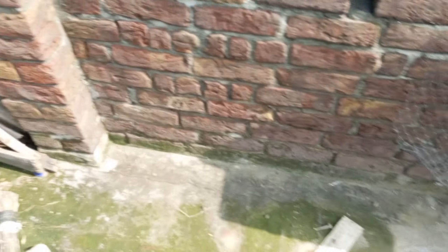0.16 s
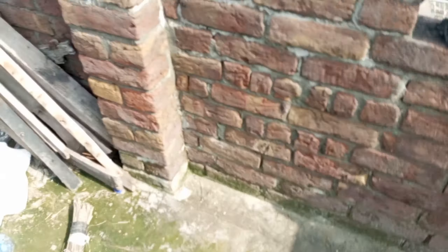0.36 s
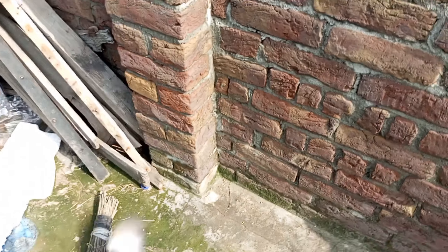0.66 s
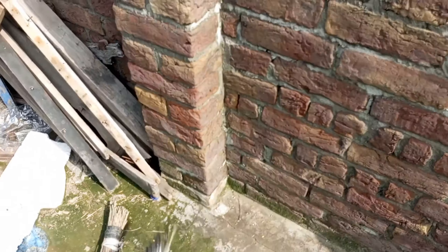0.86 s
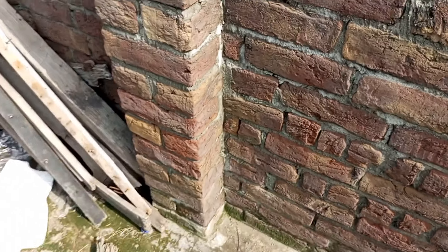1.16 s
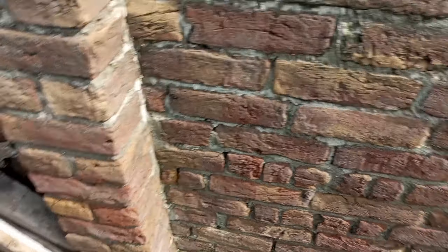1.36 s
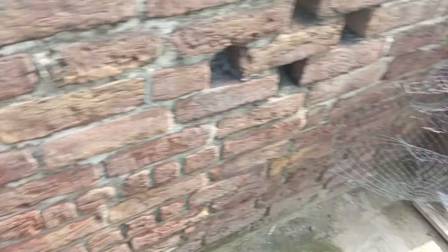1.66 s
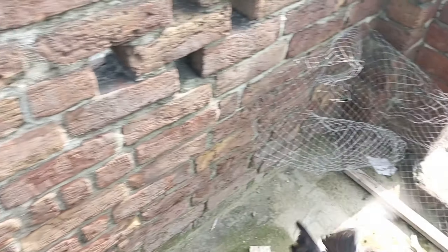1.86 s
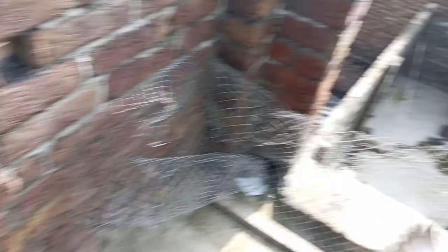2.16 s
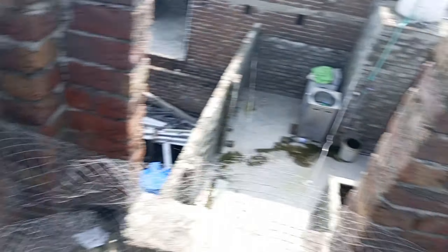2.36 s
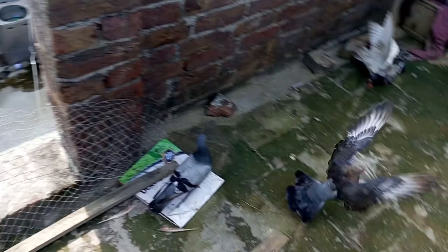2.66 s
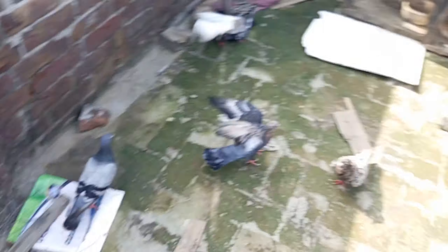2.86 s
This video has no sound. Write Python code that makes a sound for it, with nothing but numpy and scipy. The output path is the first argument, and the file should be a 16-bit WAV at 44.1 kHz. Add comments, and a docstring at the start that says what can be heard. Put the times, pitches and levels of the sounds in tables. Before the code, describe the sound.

Pigeons scuffle on a brick-walled rooftop: a few early wing slaps and swishes, then a dense flurry with knocks and thumps, among hoarse chick peeps and thin falling whistles, heard on a phone with short wall echoes.

```python
"""A walled rooftop where pigeons scuffle, over a distant town hum of shaped noise, heard through a phone.
Noise bursts make wing slaps and rippling swishes; hiss and crackles make feather rustle and claw scrabble;
sagging low tones thump and short pushes knock. Chicks nearby give hoarse two-note peeps and thin falling
whistles, near sines roughened by a noisy flutter. The walls return echoes and a short tail."""
import sys
import numpy as np
from scipy import signal
from scipy.fft import rfft, irfft
from scipy.io import wavfile

SR = 44100
rng = np.random.default_rng(int(sys.argv[2]) if len(sys.argv) > 2 else 0)


def voltage_ratio(decibels):
    """Convert decibels (scalar or array-like) to amplitude ratios, 20 dB per decade."""
    exponent = np.asarray(decibels, float) / 20
    return 10 ** exponent


def unload_audio(sound):
    """Save the sound as a 16-bit wav file, at the path given as the first command line argument."""
    columns = np.transpose(np.atleast_2d(sound))
    # keep every value between -1 and 1, then stretch to whole-number steps
    steps = np.round(np.clip(columns, -1, 1) * 32767)
    wavfile.write(sys.argv[1], SR, steps.astype(np.int16))


N = 132300
T = np.arange(N) / SR

# Spectrum of the town hum. Each row: frequency in Hz, relative density in dB.
TOWN_SPECTRUM = [(25, -36), (300, 2.5), (420, -13.5), (1000, -3), (3300, -8.5), (5200, -21.5),
                 (7500, -51.5), (16000, -64)]
# Spectrum of feather noise. Each row: frequency in Hz, relative density in dB.
FEATHER_SPECTRUM = [(300, -4.5), (900, 5.5), (2500, 9.5), (6500, -7.5), (8200, -25), (10500, -33.5),
                    (15800, -28)]
# Course of the feather rustle. Each row: time in seconds, level above 5500 Hz in dB.
RUSTLE_COURSE = [(0, -74.5), (0.678, -72.5), (0.818, -65.5), (1.0, -69.5), (1.202, -86), (1.422, -74.5),
                 (1.721, -77.5), (1.89, -63.5), (2.03, -66.5), (2.202, -68.5), (2.421, -61.5),
                 (2.601, -73.5), (2.801, -79), (3.0, -80)]
# Falling whistles. Each row: start in seconds, length in seconds, start pitch in Hz, pitch fallen towards
# in Hz, level before any swell in dB, bend of the fall (no unit; higher falls later).
WHISTLES = [(-.02, 0.14, 2670, 2082, -55, 1.03), (0.312, 0.045, 2214, 2100, -52, 0.63),
            (.285, 0.082, 3930, 3650, -49, 2), (0.502, 0.036, 3204, 2760, -48, 1.23),
            (0.838, 0.12, 3175, 2234, -53.5, 0.81), (1.038, 0.058, 2380, 2024, -51.5, 1.38),
            (1.164, 0.043, 2564, 2450, -43.5, 1), (1.222, 0.16, 3190, 1994, -55.5, 1.12),
            (1.288, 0.093, 3260, 2553, -50.5, 2.4), (1.468, 0.055, 3950, 3780, -43.5, 1.45),
            (1.545, .15, 2920, 2320, -51.5, 2.44), (2.049, .22, 4288, 2810, -52, 10),
            (2.262, .075, 3123, 2750, -60.5, 1.3), (2.265, 0.105, 2720, 2250, -53.5, 3.2),
            (2.709, 0.078, 4270, 3210, -63, 4), (2.713, 0.081, 3820, 2780, -54.5, 5.8),
            (2.708, 0.068, 2950, 2340, -53, 1.4), (2.784, 0.038, 2825, 2660, -53, 1.04)]
# Hard knocks of a wing joint or claw on the ground. Each row: start in seconds, push level in dB.
KNOCKS = [(.088, -38.5), (1.442, -38.5), (1.532, -18), (1.542, -35.5), (1.606, -37.5), (2.295, -26)]
# Wing slaps. Each row: start in seconds, treble level in dB, middle level in dB.
SLAPS = [(0.237, -69, -32), (1.0096, -44.5, -29.5), (1.3186, -78, -37.5), (1.384, -52, -58),
         (1.532, -50, -36), (1.662, -45.5, -44), (1.764, -46, -31), (1.834, -46, -35.5),
         (1.8846, -36, -26.5), (1.9165, -41, -42), (1.929, -33.5, -30), (1.976, -53, -39),
         (2.0041, -43.5, -30), (2.1296, -46.5, -35), (2.2504, -47, -35.5), (2.388, -30.5, -26),
         (2.7013, -46, -39.5)]
# Two-note peeps. Each row: start in seconds, first note level in dB, second note level in dB.
PEEPS = [(0.363, -35.5, -35.5), (0.906, -38, -36.5), (1.053, -36.5, -35), (1.386, -38.5, -38),
         (2.332, -37, -36.5)]
# Shape of the first note of a peep. Each row: time after the peep's start in seconds, pitch in Hz,
# level relative to the note in dB, hoarseness from 0 to 1.
FIRST_NOTE = [(0, 4200, -10.5, 0.8), (.04, 3900, -6.5, 0.9), (.048, 3330, -9.5, 0.8),
              (.062, 3260, -1.5, .3), (.075, 2900, 3.5, 0.5), (.088, 2680, -9.5, 0.3)]
# Shape of the second note. Each row: time after the peep's start in seconds, pitch in Hz,
# level relative to the note in dB, hoarseness from 0 to 1.
SECOND_NOTE = [(.083, 4000, 1.5, .4), (.096, 3455, -2, 0.35), (0.116, 3400, 2, 0.36),
               (0.164, 3387, -21, 0.35)]
# Wing swishes. Each row: start in seconds, length in seconds, level in dB, centre in Hz.
SWISHES = [(0.528, 0.049, -47.5, 1320), (0.551, 0.047, -41, 1700), (0.697, 0.059, -45, 1405),
           (0.73, 0.059, -44.5, 1616), (1.419, 0.023, -51.5, 2240), (2.367, 0.11, -49.5, 1744)]
# Hollow thumps of body and feet. Each row: start in seconds, level in dB, starting pitch in Hz.
THUMPS = [(0.967, -29.5, 311), (1.539, -54, 167), (1.79, -46, 306), (1.869, -36.5, 368), (1.914, -40, 382),
          (1.963, -39, 287), (2.092, -48.5, 273), (2.124, -48.5, 137), (2.212, -39, 361),
          (2.286, -46.5, 613.5)]
# Echoes off the walls. Each row: delay in seconds, level in dB.
WALL_ECHOES = [(.0047, -11.5), (.013, -12.5)]


def unit(x):
    """Scale to rms 1."""
    return x / np.sqrt(np.mean(x ** 2))


def band(x, lo_hz, hi_hz):
    """Butterworth band-pass, scaled to rms 1."""
    return unit(signal.sosfilt(signal.butter(2, [lo_hz, hi_hz], "band", fs=SR, output="sos"), x))


def high_pass(x, hz, order=2):
    """Butterworth bass cut."""
    return signal.sosfilt(signal.butter(order, hz, "high", fs=SR, output="sos"), x)


def colour(x, table):
    """Filter a signal by a (Hz, dB) table, drawn straight over log frequency."""
    table_hz, db = np.array(table).T
    hz = np.arange(N // 2 + 1) * SR / N + 1
    return irfft(rfft(x) * voltage_ratio(np.interp(np.log(hz), np.log(table_hz), db)), N)


def walk(rate):
    """Smooth random wander, rms 1; a higher rate in Hz wanders faster."""
    k = max(int(SR / rate), 1)
    return unit(signal.fftconvolve(rng.standard_normal(N), np.hanning(2 * k), "same"))


def blow(t, rise, t60):
    """Envelope: quick rise, exponential fall of 60 dB in t60 seconds."""
    u = np.maximum(T - t, 0)
    return (1 - np.exp(-u / rise)) * np.exp(-np.log(1000) * u / t60)


def fade(t, length, edge):
    """Envelope: 1 inside the span, with soft ends."""
    return np.sin(np.pi / 2 * np.clip(np.minimum(T - t, t + length - T) / edge, 0, 1)) ** 2


def town():
    """Distant hum: shaped noise whose level barely wanders."""
    level_db = -59 + 0.61 * walk(2.4)
    return voltage_ratio(level_db) * unit(colour(rng.standard_normal(N), TOWN_SPECTRUM))


def rustle():
    """Feather hiss, dense small claw and quill crackles, and a low buffeting that partly follows their level."""
    crackles_per_s, crackle_t60_s, crackle_over_hiss_db = 400, .012, -1
    s, db = np.array(RUSTLE_COURSE).T
    course_db = np.interp(T, s, db)
    hits = (rng.random(N) < crackles_per_s / SR) * rng.random(N)
    ringing = np.exp(-np.log(1000) / crackle_t60_s / SR)
    crackle = signal.lfilter([1], [1, -ringing], hits) * rng.standard_normal(N)
    hiss = rng.standard_normal(N)
    grains = colour(voltage_ratio(crackle_over_hiss_db) * unit(crackle) + hiss, FEATHER_SPECTRUM)
    treble = high_pass(grains, 5500, order=4)
    grains = grains / np.sqrt(np.mean(treble ** 2)) * voltage_ratio(course_db + 2.0 * walk(34))
    # buffeting sits around -66 dB when the rustle is at -79.5 dB, and gains 0.65 dB per rustle dB
    buffet_db = -66 + 0.65 * (course_db + 79.5) + 3.2 * walk(14.0)
    return grains + band(rng.standard_normal(N), 125, 487) * voltage_ratio(buffet_db)


def syrinx(hz, env, hoarse, rasp, octave_db, half_db=-80):
    """A near sine with a weak octave and, when hoarse, a half pitch; hoarseness trades it for a noisy flutter."""
    phase = 2 * np.pi * np.cumsum(hz) / SR
    hoarse = np.clip(hoarse, 0, 1)
    flutter = np.sqrt(1 - hoarse) + np.sqrt(hoarse / 2) * rasp
    octave = voltage_ratio(octave_db) * np.exp(2j * phase)
    half = voltage_ratio(half_db) * hoarse ** 2 * np.exp(.5j * phase)
    return np.sqrt(2) * env * np.real(flutter * (np.exp(1j * phase) + octave + half))


def flutter_noise(hz):
    """Complex random wander that roughens both the level and the phase of a voice."""
    return walk(hz) + 1j * walk(hz)


def whistles():
    """Thin chick whistles: slightly hoarse tones gliding down, the late-falling ones swelling at the end."""
    hoarse, octave_db, edge_s, swell = 0.3, -42, 0.006, 0.4
    rasp = flutter_noise(200)
    out = 0
    for t, length, hz0, hz1, db, bend in WHISTLES:
        u = np.clip((T - t) / length, 0, 1)
        growth = np.clip(1 + swell * (bend - 1) * u ** 6, 1, 3)
        env = voltage_ratio(db) * fade(t, length, edge_s) * growth
        # the glide ends 9 % of its span beyond the pitch it falls towards
        hz = hz0 + (hz1 - hz0) * (0.11 * u + 0.98 * u ** bend)
        own_rasp = np.roll(rasp, rng.integers(N))
        out = out + syrinx(hz, env, hoarse, own_rasp, octave_db)
    return out


def knocks():
    """Hard contact: one very short push each, with a thin tick of treble noise on top."""
    contact_s, tick_db = 0.00053, -29  # tick level is relative to the push
    push = -sum(voltage_ratio(db) * fade(t, contact_s, contact_s / 2) for t, db in KNOCKS)
    tick_env = sum(voltage_ratio(db + tick_db) * blow(t, 0.0019, 0.01) for t, db in KNOCKS)
    tick = band(rng.standard_normal(N), 14000, 19845) * tick_env
    return high_pass(push, 130) + tick


def slaps():
    """Feather on feather: gritty noise bursts, each with its own share of treble and middle."""
    rise_s, t60_s, presence_db, grit_db = 0.0019, 0.06, 4.5, 2.5
    air = rng.standard_normal(N) * voltage_ratio(grit_db * walk(1200))
    feathers = colour(air, FEATHER_SPECTRUM)
    treble = band(feathers, 6000, 19845)
    presence = band(feathers, 2560, 4470)
    middle = band(feathers, 510, 3300)
    out = 0
    for t, treble_db, middle_db in SLAPS:
        between_db = (treble_db + middle_db) / 2 + presence_db
        burst = voltage_ratio(treble_db) * treble + voltage_ratio(between_db) * presence + voltage_ratio(middle_db) * middle
        out = out + blow(t, rise_s, t60_s) * burst
    return out


def peeps():
    """Hoarse chick peeps: two gliding notes whose pitch shakes and whose tone breaks up with hoarseness."""
    octave_db, half_db, edge_s = -35, -12, 0.005
    rasp = flutter_noise(330) + 0.73 * flutter_noise(1500)  # slow rasp plus finer grit
    wobble = .045 * walk(90)  # share of the pitch at full hoarseness
    out = 0
    for t, *note_dbs in PEEPS:
        for note, db in zip((FIRST_NOTE, SECOND_NOTE), note_dbs):
            s, note_hz, note_level, note_hoarse = np.array(note).T
            hz, level, hoarse = (np.interp(T - t, s, v) for v in (note_hz, note_level, note_hoarse))
            env = voltage_ratio(db + level) * fade(t + s[0], s[-1] - s[0], edge_s)
            out = out + syrinx(hz * (1 + wobble * hoarse), env, hoarse, rasp, octave_db, half_db)
    return out


def swishes():
    """Air pushed past the flight feathers; the quills ripple past one after another."""
    quills_per_s, edge_share, width = 215, .4, 0.65  # width is a share of the centre frequency
    top_db, low_db = -11, -6
    air = rng.standard_normal(N) * voltage_ratio(2.4 * walk(100))
    feathers = colour(air, FEATHER_SPECTRUM)
    ripple = (.5 + .5 * np.sin(2 * np.pi * quills_per_s * T + 3.14 * walk(48))) ** 2
    top = voltage_ratio(top_db) * ripple * band(feathers, 1900, 9900)
    low = voltage_ratio(low_db) * band(air, 280, 1300)
    out = 0
    for t, length, db, hz in SWISHES:
        core = (.5 + 1.53 * ripple) * band(feathers, hz * (1 - width / 2), hz * (1 + width / 2))
        out = out + voltage_ratio(db) * fade(t, length, edge_share * length) * (core + top + low)
    return out


def thumps():
    """A soft push swells and dies in a hollow body: a sagging low tone, and an overtone that peaks later."""
    cycles, sag = 3.36, 0.087  # cycles to the peak before sag; share of pitch lost per such span
    over_ratio, over_db = 1.85, -6.5
    out = 0
    for t, db, hz in THUMPS:
        u = np.maximum(T - t, 0) * hz / cycles  # swell peaks at 1
        phase = 2 * np.pi * cycles * (u - sag * np.minimum(u, 3) ** 2 / 2)
        swell = u ** 2 * np.exp(1 - u ** 2)
        overtone = voltage_ratio(over_db) * u * np.sin(over_ratio * phase)
        out = out + voltage_ratio(db) * swell * (np.sin(phase) + overtone)
    return out * voltage_ratio(3.5 * walk(250))  # level flutters


def yard(x):
    """Walls return a few echoes and a short dull tail of decaying noise."""
    t60_s, tail_db = 0.21, -19.5
    t = T[:SR // 2]
    dull_noise = signal.lfilter([.4], [1, -.6], rng.standard_normal(len(t)))
    tail = dull_noise * np.exp(-np.log(1000) * t / t60_s) * (t > .008)
    response = voltage_ratio(tail_db) * tail / np.sqrt(np.sum(tail ** 2))
    for lag, db in ((0, 0), *WALL_ECHOES):  # direct sound first
        response[int(lag * SR)] += voltage_ratio(db)
    return signal.fftconvolve(x, response)[:N]


def scene():
    """Voices, wings and knocks ring between the walls; thumps, rustle and town stay dry."""
    echoing = whistles() + knocks() + slaps() + peeps() + swishes()
    return (yard(echoing) + town() + rustle() + thumps())[None]


def low_pass(x):
    """Removes everything above the highest recorded frequency."""
    return signal.sosfilt(signal.butter(12, 16170, fs=SR, output="sos"), x)


def record(dry):
    """The phone cuts the bass below 64 Hz and the top near 16.6 kHz."""
    mix = high_pass(dry, 64)
    mix = signal.sosfilt(signal.cheby2(10, 60, 16600, fs=SR, output="sos"), mix)
    return low_pass(mix)


dry = scene()
out = record(dry)
unload_audio(out)
```